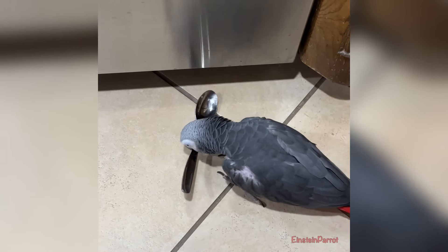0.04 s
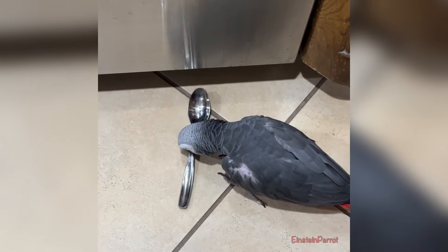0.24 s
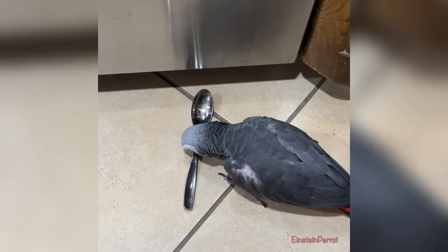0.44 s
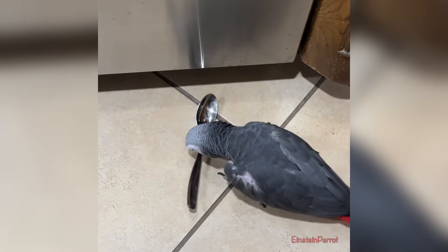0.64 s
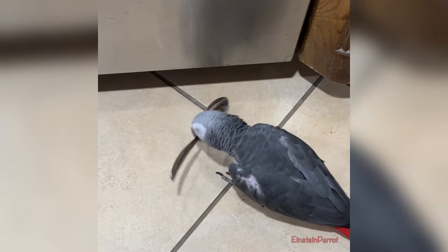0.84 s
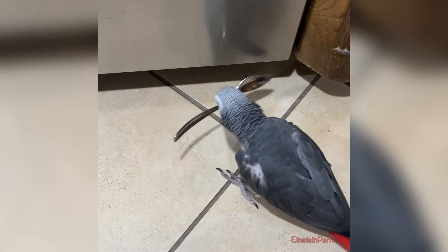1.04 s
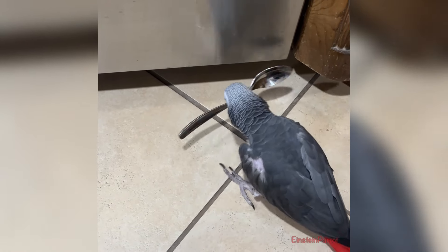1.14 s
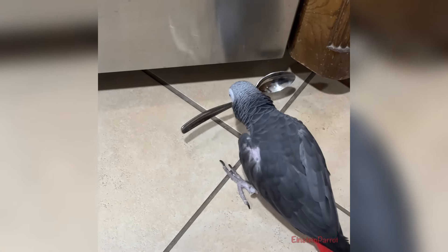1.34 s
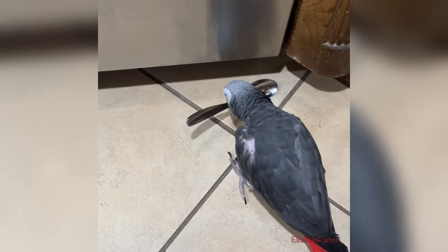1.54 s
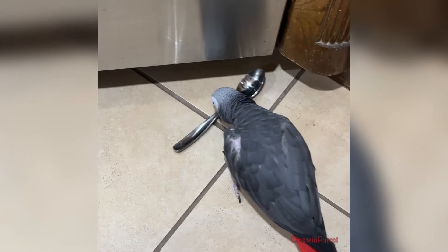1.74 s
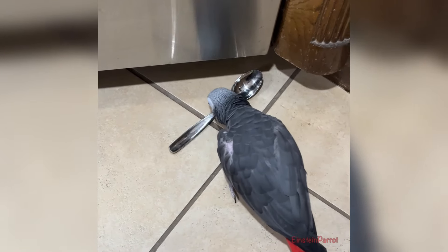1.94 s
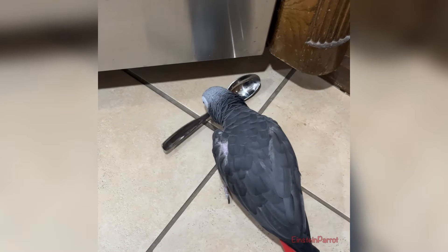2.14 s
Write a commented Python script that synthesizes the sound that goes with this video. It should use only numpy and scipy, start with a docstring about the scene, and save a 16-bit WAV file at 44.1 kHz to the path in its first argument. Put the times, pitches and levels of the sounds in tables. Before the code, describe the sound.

A metal spoon clatters on kitchen tiles, ringing brightly, then knocks dully and bounces again

```python
"""Room noise, a low rumble and rustle (all shaped noise) and an appliance hum (sines) run throughout.
A spoon knock is fading at the start. Then a parrot's steel spoon lands on kitchen tiles at 0.23 s and
chatters in quick bounces: contacts feed its ring (wavering sines), with ticks and thumps; touch damps it.
At 1.53 s it knocks dully, held in the beak (noise in broad resonances); at 1.71 s it lands and bounces again.
The kitchen answers with fading noise; two close microphone ports hear the spoon with phase differences."""
import sys
import numpy as np
from scipy import signal
from scipy.fft import rfft, irfft, next_fast_len
from scipy.io import wavfile
from scipy.ndimage import uniform_filter1d, map_coordinates

SR = 44100
rng = np.random.default_rng(int(sys.argv[2]) if len(sys.argv) > 2 else 0)


def rack_gain(trim_db):
    """Turn a fader trim in dB into the linear factor to multiply a signal by."""
    fader = np.asarray(trim_db, float)
    return 10 ** (fader / 20)


def master_out(mix):
    """Clip the mix to full scale and print it as 16-bit PCM to the path in sys.argv[1]."""
    frames = np.transpose(np.atleast_2d(mix))
    ceiling = np.clip(frames, -1, 1)
    pcm = np.round(ceiling * 32767).astype(np.int16)
    wavfile.write(sys.argv[1], SR, pcm)


N = 94815  # samples heard
LEAD_S = 0.25  # time worked out before t = 0, so that earlier knocks are already fading at the start
M = N + int(LEAD_S * SR)
T = np.arange(M) / SR - LEAD_S  # time of each sample (s)


def unit(x):
    """Scales a sound to an rms of 1."""
    return x / np.sqrt(np.mean(x ** 2) + 1e-20)


def along(points, hz):
    """Reads a curve of (f/Hz, value) points at the frequencies hz, on a log axis."""
    f, v = np.transpose(points)
    return np.interp(np.log(hz + 1), np.log(f + 1), v)


def level(rows):
    """Loudness over time, drawn in straight dB lines between (t/s, level/dB) points."""
    return rack_gain(np.interp(T, *np.transpose(rows)))


def wobble(rate, count=1):
    """Smooth random curves through `rate` random knots a second."""
    knots = rng.standard_normal((count, 400))
    return np.array([map_coordinates(k, [np.arange(M) * rate / SR]) for k in knots])


def filtered(x, response):
    """Multiplies the spectrum of x by a (possibly complex) response of frequency."""
    m = next_fast_len(M + SR // 4)
    return irfft(rfft(x, m) * response(np.fft.rfftfreq(m, 1 / SR)), m)[..., :M]


def burst(response, rows):
    """Noise that starts at each (t/s, level/dB, t60/s), dies away, and is then coloured."""
    power = sum((T >= s) * rack_gain(2 * (db - 60 * np.abs(T - s) / t60)) for s, db, t60 in rows)
    noise = rng.standard_normal(M)
    return filtered(np.sqrt(power) * noise, response) / np.std(filtered(noise, response))


# how alike left and right are in the background noises: (f/Hz, likeness, 1 = the same)
LIKENESS = [(40, .995), (100, 0.9), (200, .6), (400, .2), (800, .1), (1500, 0.86), (3000, 1), (6000, .7)]


def rush(spectrum, patchy_db):
    """Stereo noise of rms 1: random gains in patches of time and pitch make it uneven."""
    z = signal.stft(rng.standard_normal((2, M + 999)), nperseg=512)[2]
    patches = rng.standard_normal(z.shape[1:])
    patches = uniform_filter1d(patches, size=4, axis=0)
    patches = uniform_filter1d(patches, size=8, axis=1)
    pair = signal.istft(z * rack_gain(patchy_db * unit(patches)), nperseg=512)[1][:, :M]

    def mid_side_response(hz):
        turn = np.arccos(np.clip(along(LIKENESS, hz), -1, 1)) / 2
        return rack_gain(along(spectrum, hz)) * [np.cos(turn), np.sin(turn)]

    mid, side = filtered(pair, mid_side_response)
    return unit(np.array([mid + side, mid - side]))


# how loud the rumble is: (t/s, level/dB)
RUMBLE_LEVEL = [(0.0, -64), (0.02, -47), (0.26, -51), (0.3, -58.5), (0.65, -49.5), (0.68, -60.5),
                (1.2, -62), (1.23, -49), (1.47, -62), (1.66, -48), (1.75, -69), (2.15, -60.5)]
# colour of the rumble: (f/Hz, relative level/dB per Hz)
RUMBLE_COLOUR = [(15, -41), (25, -12), (43, -6), (64, 3.5), (140, -6.5), (180, -36), (310, -120)]


def rumble():
    """Very deep, patchy noise that swells and sinks."""
    return level(RUMBLE_LEVEL) * rush(RUMBLE_COLOUR, patchy_db=3.5)


# how loud the rustle is: (t/s, level/dB)
RUSTLE_LEVEL = [(0.0, -48.5), (0.17, -45.5), (0.44, -54.5), (0.61, -44), (0.74, -57.5), (1.27, -44.5),
                (1.29, -53), (1.69, -49), (1.71, -56), (1.78, -62.5), (2.13, -58), (2.15, -62)]
# colour of the rustle: (f/Hz, relative level/dB per Hz)
RUSTLE_COLOUR = [(76, -33.5), (130, 1), (455, -2.5), (702, -9), (758, -3.5), (843, -17.5), (1300, -25),
                 (1690, -46), (2860, -120)]


def rustle():
    """Low noise, a little less patchy, that comes and goes."""
    return level(RUSTLE_LEVEL) * rush(RUSTLE_COLOUR, patchy_db=1.5)


# rise and fall of the room noise, also followed by the hum: (t/s, relative level/dB)
AIR_LEVEL = [(0.0, -60), (0.45, -64), (0.82, -63.5), (1.57, -63.5), (1.69, -61), (2.15, -82)]
# colour of the room noise: (f/Hz, relative level/dB per Hz)
AIR_COLOUR = [(410, -34.5), (700, -11.5), (790, -13), (850, -16), (1160, -15.5), (1530, -24), (2400, -21.5),
              (3100, -34.5), (7000, -35), (8500, -47.5), (10500, -70), (16000, -92.5)]


def room_air():
    """Nearly even noise of the room, 2 dB above its curve."""
    return rack_gain(2) * level(AIR_LEVEL) * rush(AIR_COLOUR, patchy_db=0.6)


# steady tones of the appliance: (f/Hz, left peak level/dB when the room noise is at its median)
HUM_LINES = [(59.2, -59), (371.4, -64.5), (419.9, -64.5), (769.8, -62.5), (1125, -63), (1244, -68)]


def appliance_hum():
    """Sine tones whose pitch wanders slightly; they rise and fall with the room noise."""
    wander_hz = 2.9
    hz, db = np.transpose(HUM_LINES)[..., None]
    pitch = hz + wander_hz * wobble(30, count=len(HUM_LINES))
    lines = rack_gain(db) * np.sin(2 * np.pi * np.cumsum(pitch, axis=1) / SR)
    air = level(AIR_LEVEL)
    return lines.sum(axis=0) * air / np.median(air) * rack_gain([[0], [-2]])  # right is 2 dB softer


# pitches at which the spoon rings, its modes: (f/Hz)
MODE_HZ = [925, 1642, 2918, 3026, 4241, 5832, 6771, 7666, 9490, 10410, 13176, 13297, 14634]
# each mode's share of a contact, and its free ring time:
# (relative level/dB when the bowl lands, same for the handle, same for the rim, t60/s)
MODES = [(-29, -36.5, -44, 0.54), (-22.5, -35, -40, 1.2), (-34.5, -31, -45.5, 1), (-37.5, -23, -25.5, 0.52),
         (-8.5, 1.5, -29, 0.88), (1, -10.5, -31.5, 0.67), (-30, -11.5, -31, 0.48), (-6, -11, 2.5, 0.4),
         (-2, -8, -25.5, 0.3), (-12.5, -10.5, -32.5, .5), (-15.5, -12.5, -39.5, .4), (-31, -1, -41, .4),
         (-9, -23, -27.5, .45)]
# contacts with the tiles: (t/s, bowl relative level/dB, handle relative level/dB, rim relative level/dB,
# tick level/dB)
TILE_CONTACTS = [(-.12, -36.5, -34.5, -42.5, -37), (.204, -82.5, -66, -87, -47),
                 (.2277, -15.5, -27.5, -25, -21), (.24, -16.5, -28, -15, -31.5),
                 (.2524, -29, -31, -15.5, -31.5), (.282, -18, -13.5, -24, -17),
                 (.3173, -26, -20.5, -20.5, -22), (.331, -29.5, -19.5, -24, -21),
                 (.362, -27.5, -29, -10, -19.5), (.385, -38, -32.5, -15, -31.5),
                 (.41, -33, -23.5, -25.5, -29.5), (0.493, -47, -38.5, -45, -39.5),
                 (1.5325, -36, -42.5, -27.5, -19.5), (1.546, -38, -42, -32, -23),
                 (1.697, -62, -71, -20, -52), (1.703, -66, -70, -21, -53), (1.7095, -28.5, -24, -26, -14.5),
                 (1.722, -16.5, -44, -15.5, -27), (1.738, -27.5, -23.5, -17, -22.5),
                 (1.759, -24.5, -17, -35, -20), (1.78, -24, -21.5, -27, -17), (1.8, -22.5, -21, -17, -25),
                 (1.82, -26, -17, -21.5, -31), (1.843, -26.5, -27.5, -39, -35.5),
                 (1.89, -38, -36, -25.5, -32)]
# how beak or floor touch the spoon, each state lasting until the next:
# (start t/s, extra loss/dB per s, extra pitch wander/Hz, extra flutter/dB)
TOUCHES = [(-.3, 105, 23.6, 2), (0.219, 4, .5, 0.26), (0.371, 190, 9.3, -0.5), (.43, 469, 8, -0.9),
           (.49, 57.5, 4.18, -8.5), (1.499, 251, 70, 5), (1.692, 5, 1, 1), (1.761, 167, 12.4, 0.65),
           (1.859, 258, 10.3, 4.5)]


def ring():
    """Each contact adds energy to every mode; touch drains it and alters its wavering. Gives sound, envelope."""
    free_wander_hz, free_flutter_db, wander_per_s = 5, 1.6, 110
    rise_s, phase_kick = 0.0015, 0.75  # softening of each start; random phase shift per contact (radians)
    hz = np.array(MODE_HZ)[:, None]
    *place_db, t60 = np.transpose(MODES)
    start, *state = np.transpose(TOUCHES)
    touch = np.array(state)[:, np.searchsorted(start, T).clip(1) - 1]
    loss, wander, flutter_db = uniform_filter1d(touch, size=300, axis=1)
    # energy factor lost since the beginning
    lost = rack_gain(2 * np.cumsum(60 / t60[:, None] + loss, axis=1) / SR)

    fed, kick = np.zeros((2, len(hz), M))
    turns = rng.standard_normal((len(TILE_CONTACTS), len(hz)))
    for (s, *db, _), turn in zip(TILE_CONTACTS, turns):
        at = round((s + LEAD_S) * SR)
        fed[:, at] = rack_gain(2 * (np.array(db)[:, None] + place_db)).sum(axis=0)
        kick[:, at] = phase_kick * turn

    keep = np.exp(-1 / (rise_s * SR))

    def smooth(x):
        return signal.lfilter([(1 - keep) ** 2], [1, -2 * keep, keep ** 2], x, axis=1)

    energy = smooth(np.cumsum(fed * lost, axis=1) / lost)
    pitch = hz + (free_wander_hz + wander) * wobble(wander_per_s, count=len(hz))
    flutter = rack_gain((free_flutter_db + flutter_db) * wobble(wander_per_s, count=len(hz)))
    phase = np.cumsum(2 * np.pi * pitch / SR + smooth(kick), axis=1)
    tones = np.sum(np.sqrt(energy) * flutter * np.sin(phase), axis=0)
    return tones, np.sqrt(energy.sum(axis=0))


# colour of a soft tick: (f/Hz, relative level/dB)
TICK_COLOUR = [(400, -31.5), (1500, -18.5), (3000, 0.5), (4500, -0.5), (6500, -2), (9000, -18),
               (12000, -39.5), (16500, -61)]


def ticks():
    """A very short, dull burst of noise at each contact."""
    rows = [(s, db, 0.0045) for s, *_, db in TILE_CONTACTS]
    return burst(lambda hz: rack_gain(along(TICK_COLOUR, hz)), rows)


# colour of the buzz on the glaze: (f/Hz, relative level/dB)
CHATTER_COLOUR = [(700, -33), (1500, -12), (3000, -14), (4500, 2), (6000, -1), (8000, -0.5), (10000, -17.5),
                  (11000, -54.5), (16500, -66)]


def chatter(envelope):
    """The ringing steel buzzes on the glaze in tiny uneven taps, as loud as the ring lets it."""
    taps_per_s, spread_db, below_ring_db = 600, 3, -23.5
    u, size = rng.random(M), rng.standard_normal((2, M))
    taps = (u < taps_per_s / SR) * np.sign(size[0]) * rack_gain(spread_db * size[1])
    taps = taps + 0.033 * size[0]  # faint hiss between taps
    buzz = unit(filtered(taps, lambda hz: rack_gain(along(CHATTER_COLOUR, hz))))
    return rack_gain(below_ring_db) * envelope * buzz


# how long the kitchen's answer lasts: (f/Hz, t60/s)
KITCHEN_T60 = [(300, .6), (2000, .8), (5000, 0.6), (10000, .45), (16000, 0.093)]


def kitchen(x):
    """The room answers with noise in which each frequency dies at its own speed."""
    hz, t, z = signal.stft(rng.standard_normal(SR), SR, nperseg=256)
    fade = rack_gain(-60 * t / along(KITCHEN_T60, hz)[:, None])
    tail = signal.istft(z * fade, SR, nperseg=256)[1]
    delayed = np.pad(x, (200, 0))  # 200 samples, about 4.5 ms
    return rack_gain(-10) * signal.fftconvolve(delayed, tail / np.linalg.norm(tail))[:M]


# knocks with the spoon held in the beak: (t/s, level/dB, t60/s, pitch factor from the tightness of the hold)
HELD_KNOCKS = [(-.1, -40, 0.34, .98), (1.5333, -18.5, .12, 1.02), (1.548, -23.5, .25, .995),
               (1.61, -35.5, .25, 0.9)]
# broad resonances of the held spoon: (f/Hz, width/Hz, relative level/dB)
HELD_RESONANCES = [(913, 94, -8), (2897, 109.7, -6.5), (4422, 170, -3.5), (6000, 360, -10.5),
                   (6850, 90, -13), (7740, 130, -1), (9600, 750, 0), (13350, 302, -3.5), (14640, 60, -2)]
# colour of the scrape under them: (f/Hz, relative level/dB)
SCRAPE_COLOUR = [(500, -43), (1000, -22), (2000, -25), (4500, -31), (8000, -21), (10200, -26), (11200, -58),
                 (16500, -60)]


def held_knocks():
    """Damped by the beak, the spoon gives noise in broad resonances instead of clear tones."""
    def peak(f, centre, width):
        return (f * width) ** 2 / ((centre * centre - f * f) ** 2 + (f * width) ** 2)

    def body(f):
        peaks = sum(rack_gain(db) * peak(f, centre, width) for centre, width, db in HELD_RESONANCES)
        return rack_gain(along(SCRAPE_COLOUR, f)) + peaks

    # the hold shifts only what lies below 7 kHz
    return sum(burst(lambda f: body(f / tight ** (f < 7000)), [(s, db, t60)])
               for s, db, t60, tight in HELD_KNOCKS)


# hard landings: (t/s, crack level/dB, thump relative level/dB)
HARD_LANDINGS = [(0.2275, 1.5, -26.5), (1.5332, -9.5, -34), (1.7091, -2.5, -23)]
# colour of the hard crack: (f/Hz, relative level/dB)
CRACK_COLOUR = [(150, -29), (450, -14.5), (900, -11), (2500, -12.5), (6000, -11.5), (11000, 7),
                (13000, -10.5), (16500, -20.5)]


def cracks():
    """A hard landing gives a very short, wide burst of noise."""
    rows = [(s, db, 0.0045) for s, db, _ in HARD_LANDINGS]
    return burst(lambda hz: rack_gain(along(CRACK_COLOUR, hz)), rows)


# the floor's dull answer: (f/Hz, relative level/dB, t60/s)
TILE_MODES = [(442.2, -5, 0.048), (600, 1.5, 0.019), (930, -8.5, 0.03)]


def thumps():
    """A hard landing makes the tile sound in a few low sines that start softly and die fast."""
    total = np.zeros(M)
    for s, _, db in HARD_LANDINGS:
        since = np.abs(T - s)
        for hz, mode_db, t60 in TILE_MODES:
            fade = (T >= s) * rack_gain(db + mode_db - 60 * since / t60)
            rise = 1 - np.exp(-since / 0.00099)
            total += fade * rise * np.sin(2 * np.pi * hz * (T - s))
    return total


# how far the left port leads the right: (f/Hz, phase/radians)
PORT_LEAD = [(150, -.05), (500, -1.8), (1000, -1.8), (1400, -.02), (3200, .02), (4241, .24), (5832, -.68),
             (7666, -1.48), (9490, -2.2), (10410, -2.6), (13297, -3.57), (14634, -4.15), (16500, -4.8)]


def two_ports(x):
    """Turns one sound into left and right with opposite phase shifts, and cuts the top treble."""
    top_hz = 16680
    return filtered(x, lambda hz: (hz < top_hz) * np.exp(0.5j * along(PORT_LEAD, hz) * [[1], [-1]]))


def scene():
    """The spoon and its room reach the two ports; the background lies underneath."""
    background = rumble() + rustle() + room_air() + appliance_hum()
    tones, envelope = ring()
    spoon = tones + ticks() + chatter(envelope) + held_knocks() + cracks() + thumps()
    heard = two_ports(spoon + kitchen(spoon))
    return (heard + background)[:, -N:]


def low_pass(x):
    """Removes everything above the highest recorded frequency."""
    return signal.sosfilt(signal.butter(12, 16680, fs=SR, output="sos"), x)


def record(dry):
    """The phone rounds off the highest peaks, just below a size of 0.86."""
    mix = dry / (1 + np.abs(dry / 0.86) ** 20) ** (1 / 20)
    return low_pass(mix)


dry = scene()
out = record(dry)
master_out(out)
```